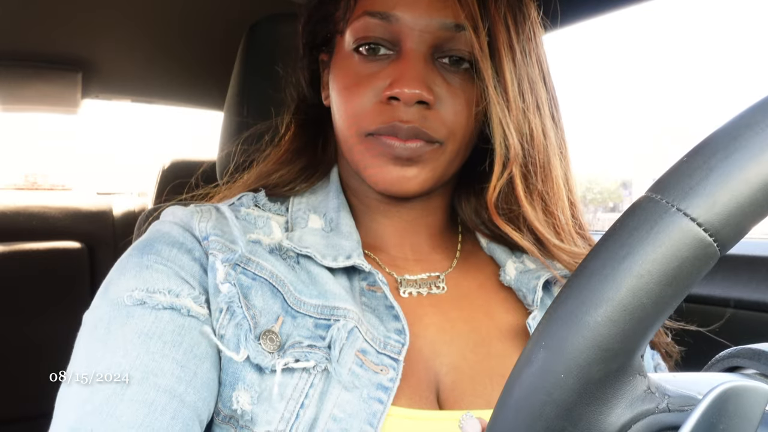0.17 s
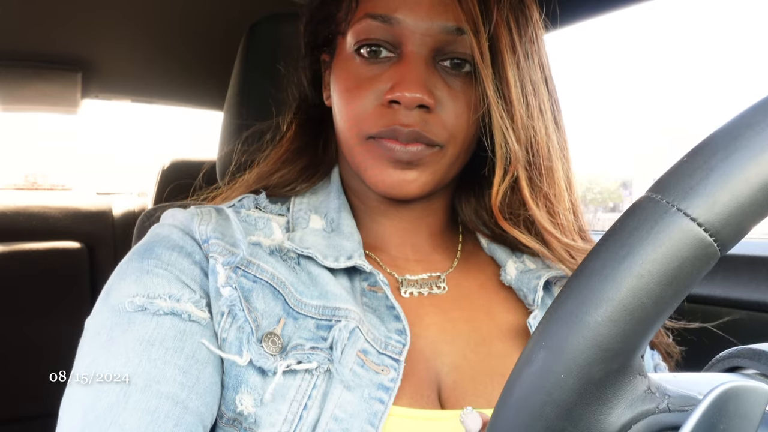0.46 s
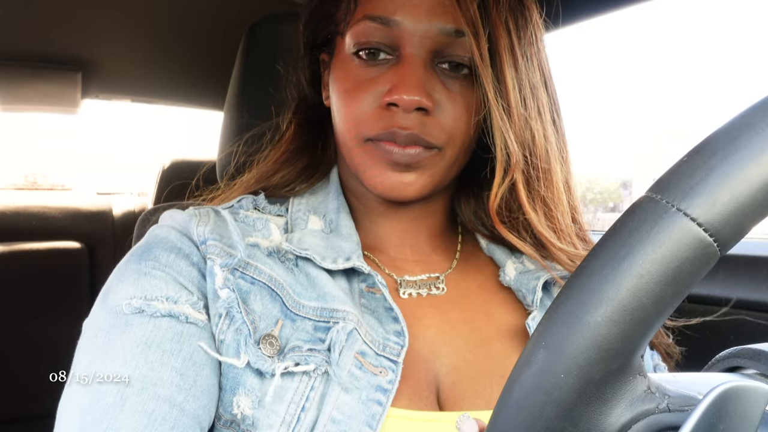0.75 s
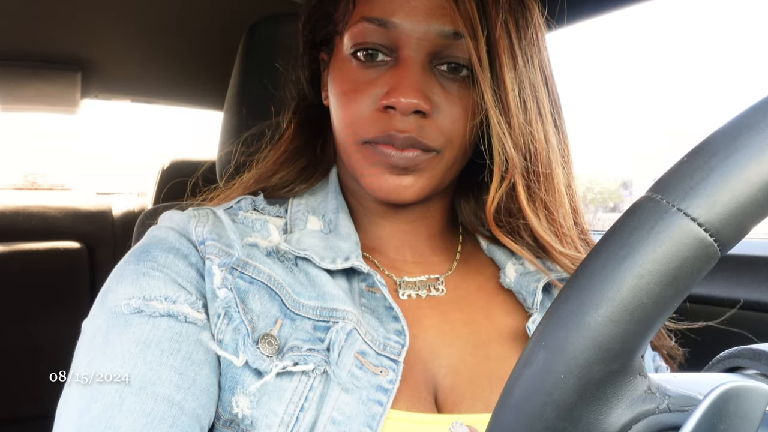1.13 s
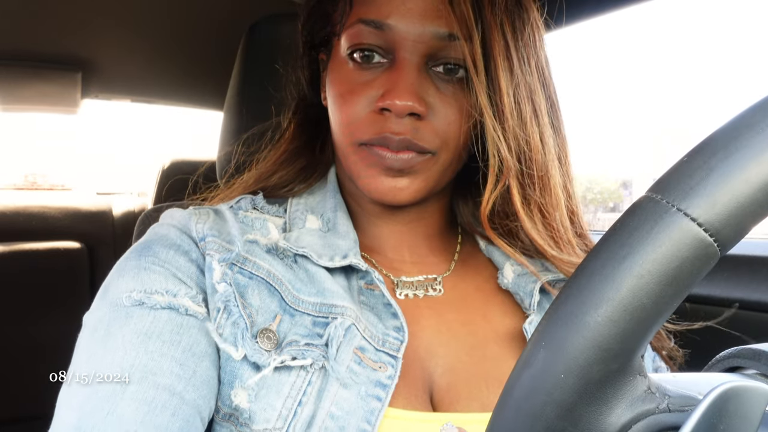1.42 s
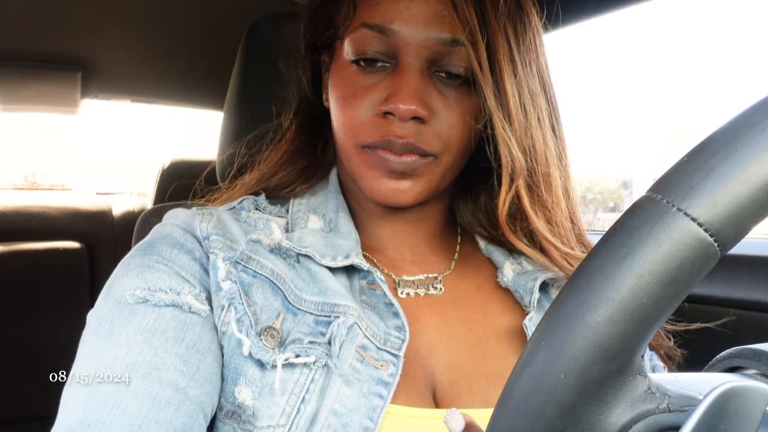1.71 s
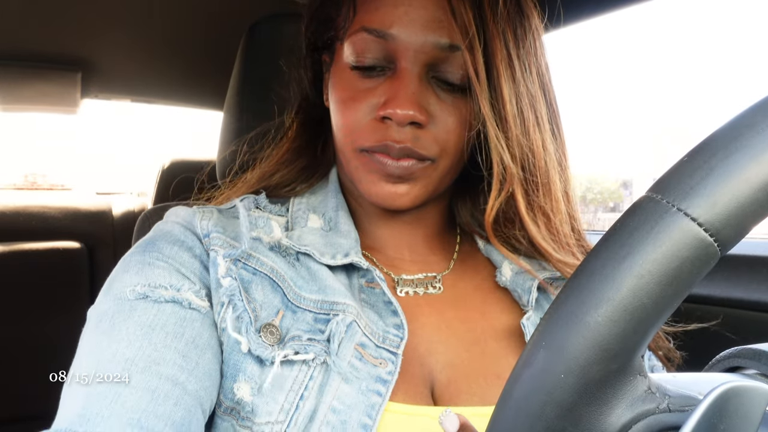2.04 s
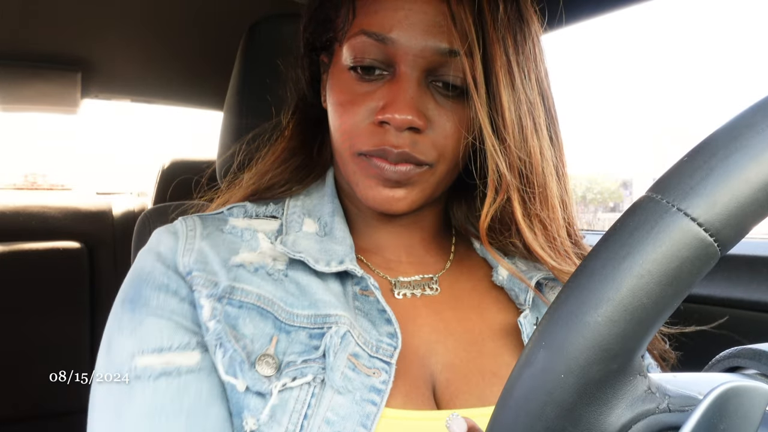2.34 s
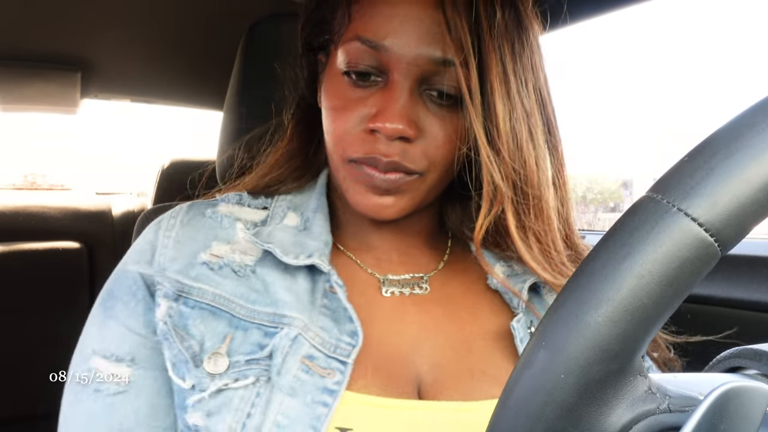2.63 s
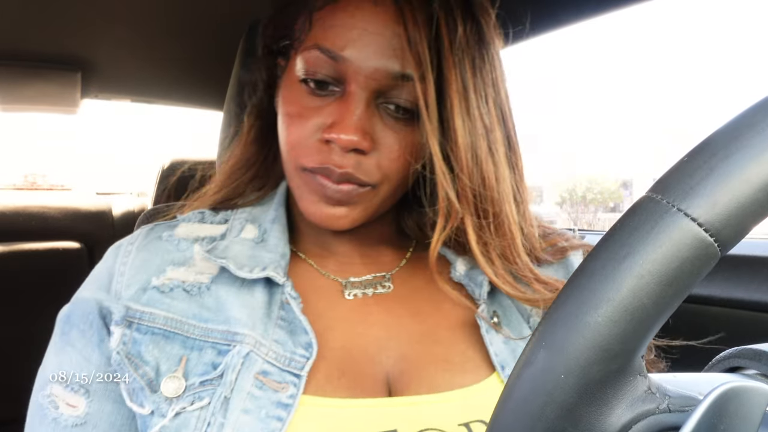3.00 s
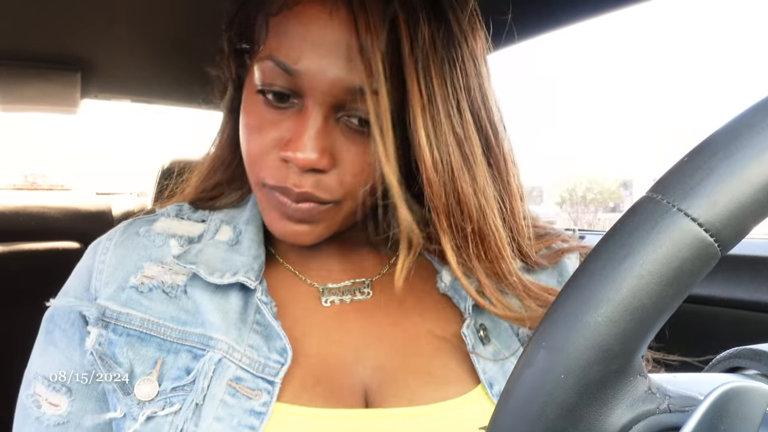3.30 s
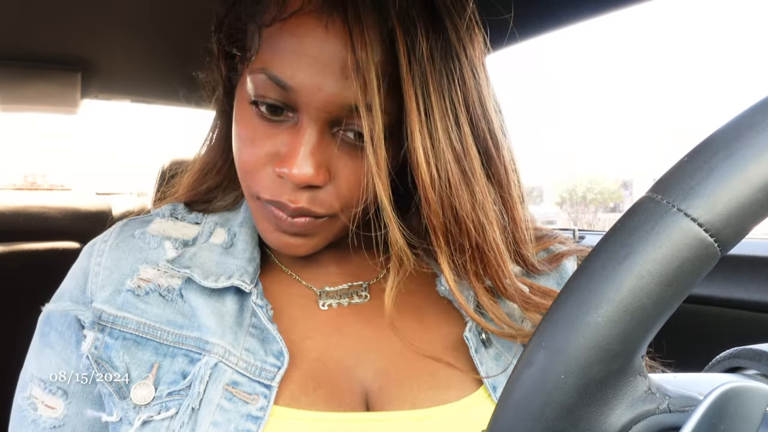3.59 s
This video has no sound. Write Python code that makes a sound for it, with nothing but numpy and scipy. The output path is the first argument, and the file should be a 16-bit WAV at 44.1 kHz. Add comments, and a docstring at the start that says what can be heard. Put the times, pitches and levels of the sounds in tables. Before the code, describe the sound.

Continuous dull blower air in a parked car, captured by a phone near the seated driver; uneven low rumble beneath, with barely noticeable cloth rustles and one small hard tick early on.

```python
"""A steady rush of air from a blower fills a parked car, heard on a phone with two close microphone ports.
The rush is random spectra shaped by duct and cabin resonances; its low rumble near 180 Hz, a jittering
narrow tone, is uneven by chance, as narrow noise is. The motor adds faint wavering shaft orders, as sines.
A seated person's small movements give one tiny tick (short ringing modes), a few dry snaps (bursts
of a few cycles) and some cloth rustles (grainy noise under short strokes)."""
import sys
import numpy as np
from scipy import signal
from scipy.fft import rfft, irfft
from scipy.io import wavfile
from scipy.ndimage import uniform_filter1d

SR = 44100
rng = np.random.default_rng(int(sys.argv[2]) if len(sys.argv) > 2 else 0)


def level_to_linear(level):
    """Convert decibel levels to linear amplitude factors, elementwise."""
    exponent = np.asarray(level, float) / 20
    return 10 ** exponent


def file_out(sig):
    """Save sig as 16-bit WAV at sys.argv[1]."""
    # one column per channel
    cols = np.atleast_2d(sig).T
    # limit, then scale
    lim = np.clip(cols, -1, 1)
    pcm = np.round(lim * 32767).astype(np.int16)
    wavfile.write(sys.argv[1], SR, pcm)


N = 165375  # samples, 3.75 s


def evened(x):
    """Scales to rms 1."""
    return x / np.sqrt(np.mean(np.abs(x) ** 2) + 1e-20)


def read(points, hz, axis=1):
    """Reads a column of a table on a log-frequency axis."""
    p = np.array(points, float)
    return np.interp(np.log(hz + 1), np.log(p[:, 0] + 1), p[:, axis])


def bumps(points, hz):
    """Sum of bell-shaped resonances and cancellations, in dB."""
    return sum(db / (1 + (2 * (hz - centre) / width) ** 2) for centre, width, db in points)


def drift(t, top_hz):
    """Slow random wander of rms 1: sines from 0.2 Hz to top_hz, weaker as they get faster."""
    rates = np.geomspace(.2, top_hz, num=24)
    return evened(sum(np.sin(2 * np.pi * (f * t + rng.random())) / np.sqrt(f) for f in rates))


def ports(mid, side):
    """Left and right port from the common and the differing part."""
    return np.array([mid + side, mid - side])


def panned(pan_db):
    """Gains of the left and right port, pan_db apart."""
    return level_to_linear(np.array([[pan_db / 2], [-pan_db / 2]]))


def rush():
    """Turbulent air: random short-time spectra shaped by the ducts, with faint patches and a slow swell."""
    # broad slope of the air rush common to both ports: hz, relative density_db per Hz
    slope = [(15, -71), (25, -47), (60, -20), (99, -9), (178, -5), (400, -11), (630, -13), (1200, -15),
             (2000, -19.5), (3300, -25.5), (5720, -33.5), (7200, -42), (9000, -49.5), (12000, -59),
             (15500, -68.5)]
    # duct and cabin resonances (+) and cancellations (-) on it: centre_hz, width_hz, level_db
    ducts = [(106, 45, 2.5), (132.4, 7.3, -2), (157, 12, -2), (174, 16, -1.5), (421, 33, -3),
             (570, 17, 2.5), (389, 51, 3), (647, 60, -2), (845, 144, 4), (997, 90, 3), (1232, 200, -4.5),
             (1591, 90, 5.5), (1685, 45, -8), (1834, 120, 2.5), (1991, 97, 6.5), (2244, 95, -2.5),
             (2550, 120, 1.5), (2966, 117, -6), (3330, 170, 2.5), (3570, 130, -3), (3910, 320, 3.5),
             (4300, 120, -2), (4510, 90, 3.5), (4774, 134, 6.5), (4950, 120, -7), (5150, 130, 5.5),
             (5560, 81, -5), (5635, 88, 8), (6070, 150, 1), (6360, 200, -0.5), (6800, 250, 1.5),
             (7360, 200, -2), (7960, 320, 3.5), (9860, 200, 4.5), (10100, 200, -3), (10450, 350, 4.5),
             (11200, 300, -2), (13160, 300, -4)]
    # slope of the part that differs between the ports: hz, relative density_db per Hz
    wide_slope = [(15, -81), (25, -52), (80, -33), (140, -18.5), (239, -5), (469, -4), (900, -3),
                  (1450, -5), (2500, -7.5), (4140, -14.5), (5900, -17), (7000, -24.5), (9000, -32),
                  (10600, -35.5), (13000, -50), (15500, -48)]
    # resonances and cancellations of the differing part: centre_hz, width_hz, level_db
    wide_peaks = [(670, 90, 3.5), (760, 90, 1.5), (940, 60, 3.5), (1555, 50, -3), (3080, 120, 0),
                  (3500, 120, -4), (4900, 70, -4), (5900, 250, -1), (1310, 120, -5), (1460, 80, 9.5),
                  (1640, 70, 9.5), (1760, 50, -3), (1870, 80, 6), (2030, 60, 3), (2450, 90, -7),
                  (2700, 230, 3), (2900, 100, -3), (3760, 150, 2), (4720, 200, 7), (5060, 80, 7),
                  (5380, 150, -3), (5630, 90, 7), (6070, 100, -5), (6220, 100, 7), (7400, 200, -4),
                  (7650, 200, 2), (9500, 200, -5)]
    # how the differing part follows the common one: hz, in_step (-1..1, + leans left),
    # quarter_turn_off (-1..1)
    follow = [(200, .1, 0.29), (600, -0.14, .3), (1400, 0.063, .1), (1580, -0.079, .5), (1800, -.2, -.2),
              (2000, 0.45, -.1), (2600, 0.33, -.1), (3500, -0.056, 0), (3900, 0, -.4), (4300, -.3, 0),
              (4700, .4, -.3), (5200, -.3, -.4), (5700, -0.25, -.2), (6500, -0.14, -.3), (7700, -.3, .4),
              (9000, .1, .2), (9700, -.5, .4), (10400, .3, 0), (12000, .1, 0)]
    common_db, wide_db = -26, -38.5  # rms
    patch_db, swell_db = 0.28, 0.63  # rms depth
    size, hop = 4096, 1024

    frames, hz = N // hop + 6, np.fft.rfftfreq(size, 1 / SR)
    a, b, c, d, p = rng.standard_normal((frames, len(hz), 5)).T
    patches = evened(uniform_filter1d(uniform_filter1d(p, size=40, axis=0), size=4, axis=1))
    swell = drift(np.arange(frames) * hop / SR, 2.83)
    life = level_to_linear(patch_db * patches + swell_db * swell)

    lean = read(follow, hz) + 1j * read(follow, hz, axis=2)
    lean = (lean / np.maximum(abs(lean), 1))[:, None]
    common = (a + 1j * b) * life
    own = (c + 1j * d) * life
    other = lean * common + np.sqrt(1 - abs(lean) ** 2 + 1e-9) * own

    common_gain = level_to_linear(read(slope, hz) + bumps(ducts, hz))[:, None]
    other_gain = level_to_linear(read(wide_slope, hz) + bumps(wide_peaks, hz))[:, None]
    spectra = np.array([common * common_gain, other * other_gain])
    waves = signal.istft(spectra, nperseg=size, noverlap=size - hop)[1]
    mid, side = waves[:, 2048:N + 2048]
    return ports(level_to_linear(common_db) * evened(mid), level_to_linear(wide_db) * evened(side))


def rumble():
    """The rush's rumble near 180 Hz as a jittering narrow tone, lumpy by chance like narrow noise."""
    # chance ups and downs of the rush's random rumble near 180 Hz: time_s, rms_db
    ups_and_downs = [(0.0, -45), (0.46, -29), (0.47, -37), (0.57, -38), (0.67, -23), (0.72, -35),
                     (0.98, -33), (1.01, -44), (1.05, -36.5), (1.53, -32.5), (1.56, -25), (1.58, -44),
                     (2.0, -30.5), (2.44, -40.5), (2.47, -31), (2.68, -36), (2.71, -25.5), (2.76, -33.5),
                     (3.38, -35.5), (3.41, -47), (3.53, -31), (3.74, -35)]
    centre_hz, wander_hz, lumps_db = 180.3, 13.6, 3.5  # wander and lumps are rms

    t = np.arange(N) / SR
    slow = t[::200]
    band = signal.butter(2, [3, 22], "band", fs=SR / 200, output="sos")
    chance = signal.sosfiltfilt(band, rng.standard_normal((2, len(slow))))
    jitter, lumps = [np.interp(t, slow, evened(v)) for v in chance]
    turns = np.cumsum(centre_hz + wander_hz * jitter) / SR
    strength = level_to_linear(np.interp(t, *np.transpose(ups_and_downs))) * evened(level_to_linear(lumps_db * lumps))
    return strength * np.sqrt(2) * np.sin(2 * np.pi * turns)


def motor():
    """Shaft orders that waver together in speed and each in strength."""
    # motor orders: multiple of shaft speed, common rms_db, rms_db of the part differing between ports
    orders = [(2, -44, -89), (5, -44.5, -68), (11, -44, -61), (12, -47, -54)]
    shaft_hz, waver_hz, wobble_db = 49.97, 0.246, 1  # waver and wobble are rms

    t = np.arange(N) / SR
    slow = t[::200]
    turns = np.cumsum(shaft_hz + waver_hz * np.interp(t, slow, drift(slow, 4))) / SR
    out = np.zeros((2, N))
    for k, db, side_db in orders:
        phase = 2 * np.pi * (round(k) * turns + rng.random())
        wobble = level_to_linear(wobble_db * np.interp(t, slow, drift(slow, 3.73)))
        order = ports(level_to_linear(db) * np.sin(phase), level_to_linear(side_db) * np.cos(phase))
        out += np.sqrt(2) * wobble * order
    return out


def ticks():
    """A crack and a quick rebound into very short modes, then a brief cabin tail."""
    # small hard ticks: start_s, rms_db of the first 3 ms, pan_db (left over right)
    hits = [(1.3158, -29.5, 2)]
    # modes that a tick rings with: pitch_hz, relative level_db, t60_s
    modes = [(2700, -2, .01), (3330, 1, 0.012), (3900, -3, .015), (4620, 2, 0.014), (5600, 2, 0.009),
             (6900, 0, 0.018), (8000, -5, .009), (9300, -13, .008), (10520, -6, .011), (11800, -11, 0.011),
             (13130, -11, .009)]
    crack_db, crack_t60_s = -6.98, .006  # beside the modes
    rebound_s, rebound_db = .0013, -3
    tail_db, tail_t60_s = -2.98, .03

    t, out = np.arange(3000) / SR, np.zeros((2, N + 3000))
    band = signal.butter(4, [2500, 13500], "band", fs=SR, output="sos")
    top = signal.cheby2(8, 24, 14300, fs=SR, output="sos")
    for s, db, pan_db in hits:
        ring = sum(level_to_linear(m_db - 60 * t / t60) * np.sin(2 * np.pi * hz * t) for hz, m_db, t60 in modes)
        noise = signal.sosfilt(band, rng.standard_normal(len(t)))
        ring = ring + level_to_linear(crack_db - 60 * t / crack_t60_s) * noise
        ring = ring * np.minimum(t / .0003, 1)  # soft onset
        ring = ring + level_to_linear(rebound_db) * np.roll(ring, round(rebound_s * SR)) * (t > rebound_s)
        ring = signal.sosfilt(top, ring)
        ring = ring / np.sqrt(np.mean(ring[:150] ** 2))
        # the first millisecond excites a separate decaying noise at each port
        spread = rng.standard_normal((2, len(t))) * level_to_linear(-60 * t / tail_t60_s) * (t > .002)
        spread = spread / np.linalg.norm(spread[0])
        tail = signal.fftconvolve(ring[None, :40], spread, axes=1)[:, :len(t)]
        at = round(s * SR)
        out[:, at:at + len(t)] += level_to_linear(db) * (ring * panned(pan_db) + level_to_linear(tail_db) * tail)
    return out[:, :N]


def cloth():
    """Grainy friction of fabric under short strokes that rise and die away."""
    # cloth rustles: peak_s, rise_s, fall_s, level_db, brightness_db per octave
    rustles = [(1.017, .001, .006, -46, -9), (1.073, .001, .008, -43, -8), (1.086, .003, .005, -49, -2),
               (1.263, .001, .004, -52, 0), (2.12, .004, .01, -60, 0), (2.6, .12, .12, -58, 3),
               (3.062, .0007, .004, -52, -5), (3.144, .0015, .004, -48, -7), (3.409, .001, .003, -52, 0)]
    # colour of the friction: hz, relative density_db per Hz
    colour = [(1000, -60), (2500, -15), (4000, -7), (6800, 3), (7800, 0), (9000, -3), (10500, -4),
              (11800, -13), (14500, -16), (15800, -30)]
    grains_per_s = 2500

    t, hz = np.arange(N) / SR, np.fft.rfftfreq(N, 1 / SR)
    grains = (rng.random(N) < grains_per_s / SR) * rng.standard_normal(N) * 4
    shared_hiss = .6 * rng.standard_normal(N)
    port_hiss = .5 * rng.standard_normal((2, N))
    noise = rfft(grains + shared_hiss + port_hiss) * level_to_linear(read(colour, hz))
    octaves = np.log2(np.maximum(hz, 3500) / 8000)
    out = np.zeros((2, N))
    for s, rise, fall, db, tilt_db in rustles:
        stroke = np.exp(-.5 * ((t - s) / np.where(t < s, rise, fall)) ** 2)
        rub = stroke * irfft(noise * level_to_linear(tilt_db * octaves), N)
        # level_db is the rms under the stroke at the left port
        out += level_to_linear(db) * rub * np.sqrt(np.sum(stroke ** 2) / np.sum(rub[0] ** 2))
    return out


def snaps():
    """Snaps of a few cycles that start fast and die at once, reaching one port slightly first."""
    # tiny dry snaps of fabric or seam: time_s, peak_db, centre_hz, pan_db (left over right)
    bursts = [(1.0162, -33, 6500, 1), (1.0655, -45, 10500, 0), (1.0722, -39, 9500, 0),
              (1.0775, -40, 9000, 0), (1.0915, -37, 6800, 0), (1.2615, -43, 10500, 0),
              (3.0613, -33, 8600, -4), (3.0639, -43, 8000, -5), (3.1419, -39, 7000, 2),
              (3.1436, -36, 7000, 0), (3.4082, -40, 9500, 0)]
    rise_cycles, skew_s = 1.1, .00002  # skew is the rms shift of each port, in opposite directions

    t, out = np.arange(200) / SR, np.zeros((2, N))
    for (s, db, hz, pan_db), skew in zip(bursts, rng.standard_normal((len(bursts), 1))):
        shift = skew_s * skew * np.array([[1], [-1]])
        cycles = np.maximum(t - .0003 + shift, 0) * hz
        envelope = cycles / rise_cycles * np.exp(1 - cycles / rise_cycles)
        snap = envelope * np.sin(2 * np.pi * cycles)
        at = round(s * SR) - 22  # the envelope peaks near time_s
        out[:, at:at + len(t)] += level_to_linear(db) * panned(pan_db) * snap
    return out


def scene():
    """Everything in the cabin, as it reaches the two ports."""
    return rush() + rumble() + motor() + ticks() + cloth() + snaps()


def top_cut(x):
    """Nothing passes above the cut-off."""
    return signal.sosfilt(signal.butter(12, 15610, fs=SR, output="sos"), x)


def record(dry):
    """The phone's recording of the cabin."""
    return top_cut(dry)


dry = scene()
out = record(dry)
file_out(out)
```